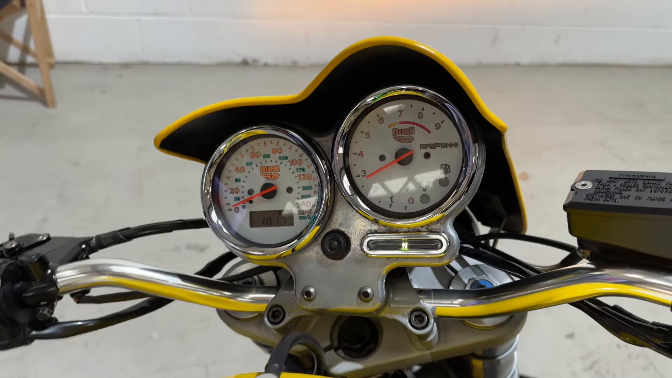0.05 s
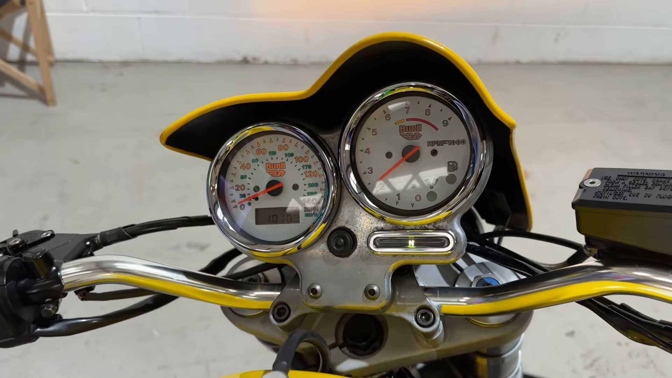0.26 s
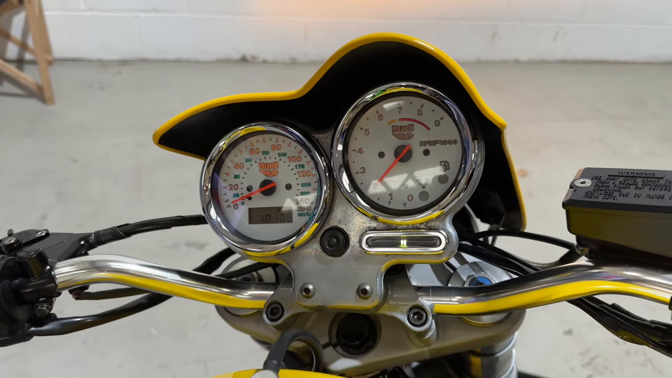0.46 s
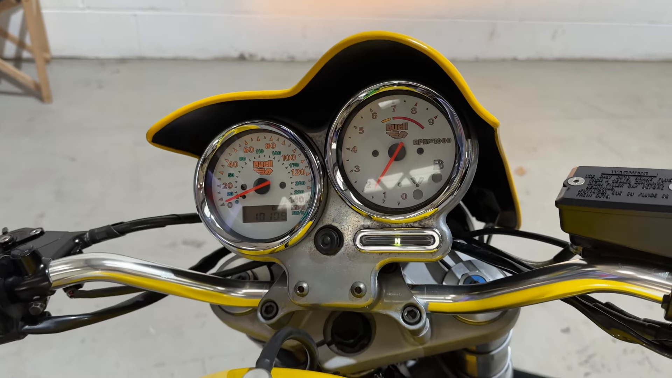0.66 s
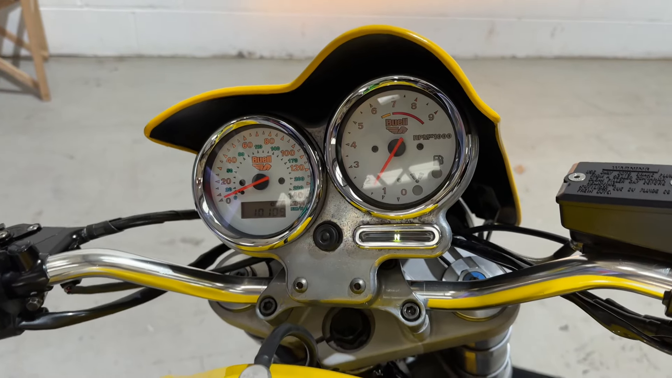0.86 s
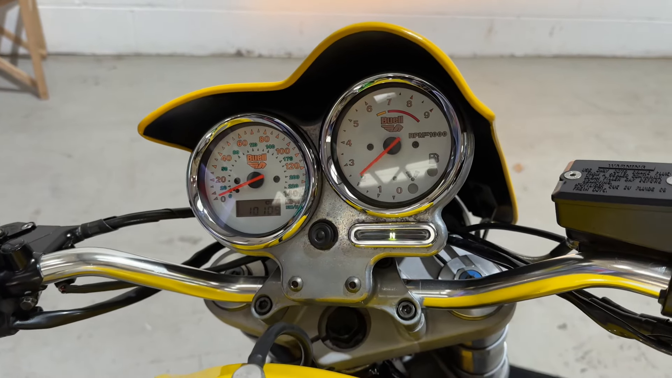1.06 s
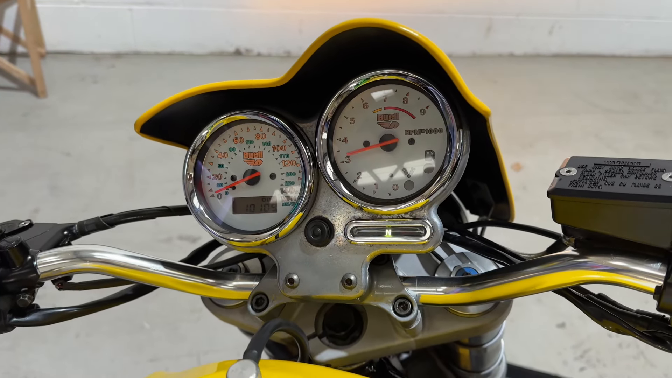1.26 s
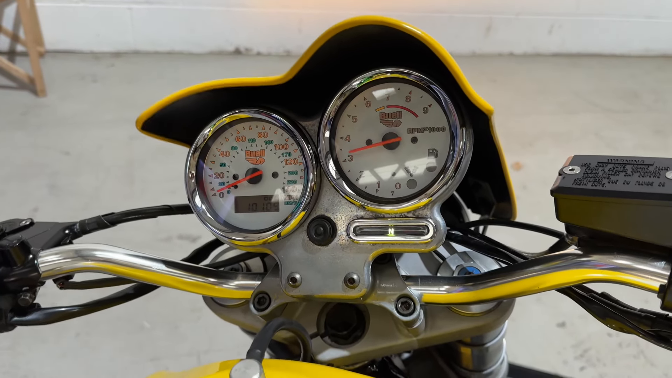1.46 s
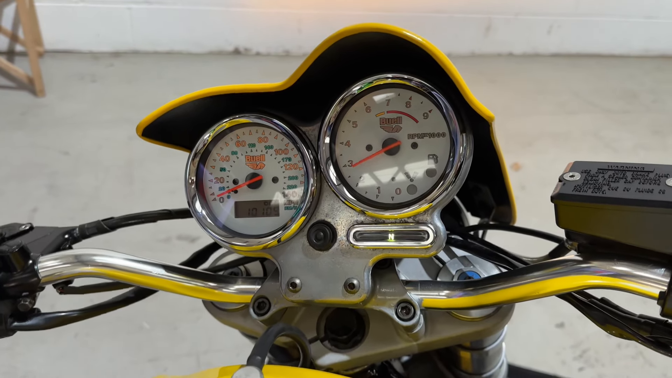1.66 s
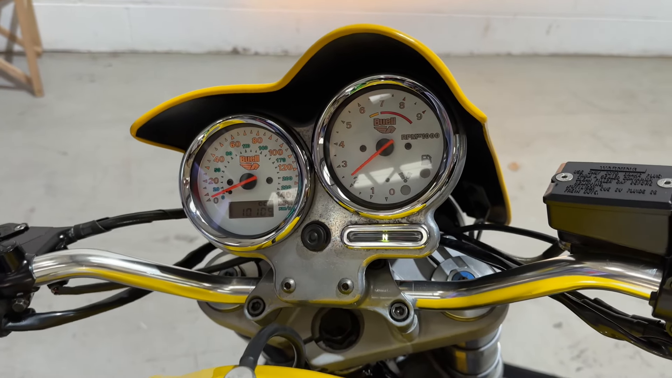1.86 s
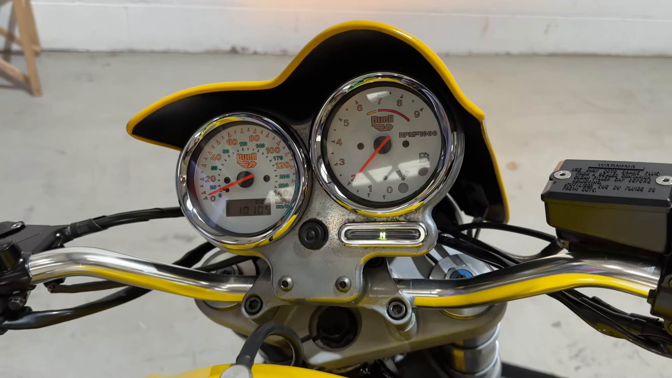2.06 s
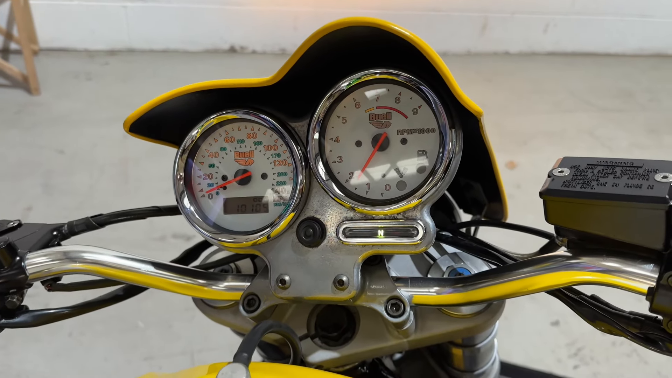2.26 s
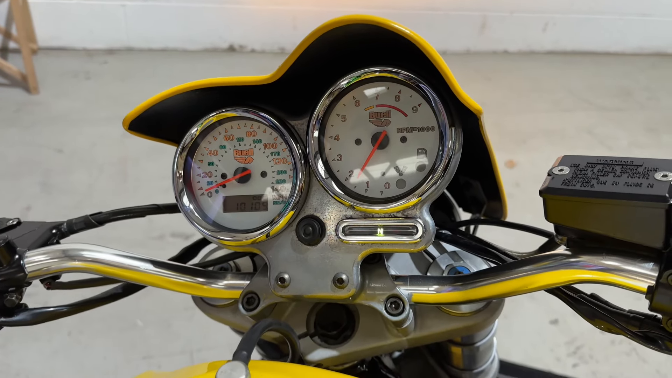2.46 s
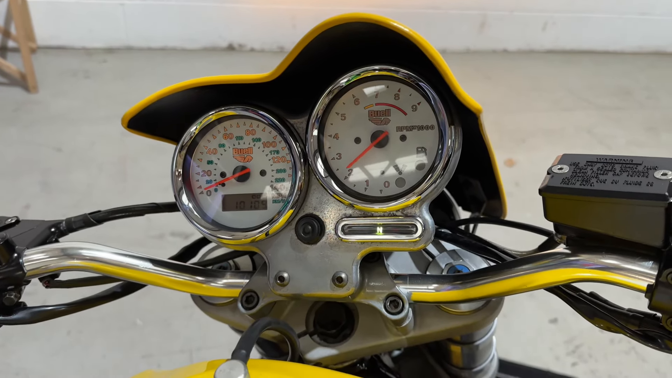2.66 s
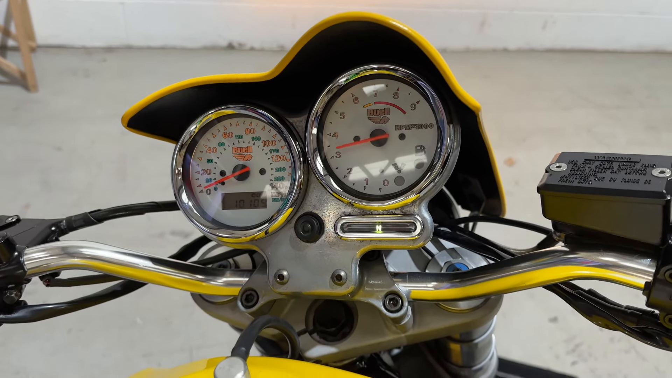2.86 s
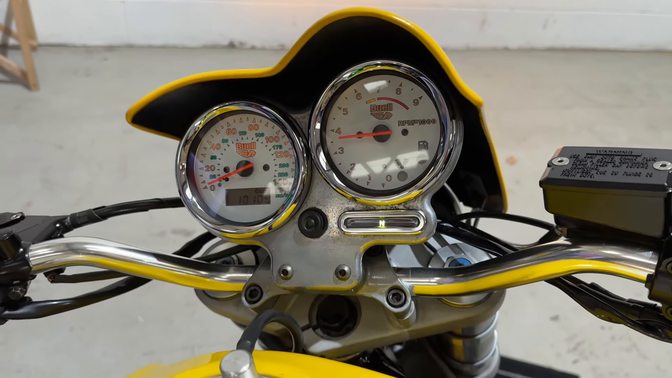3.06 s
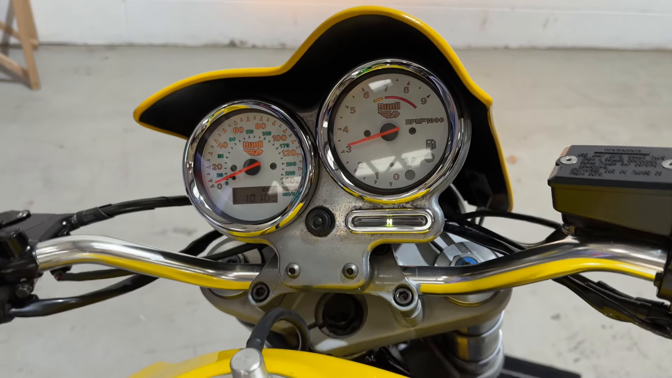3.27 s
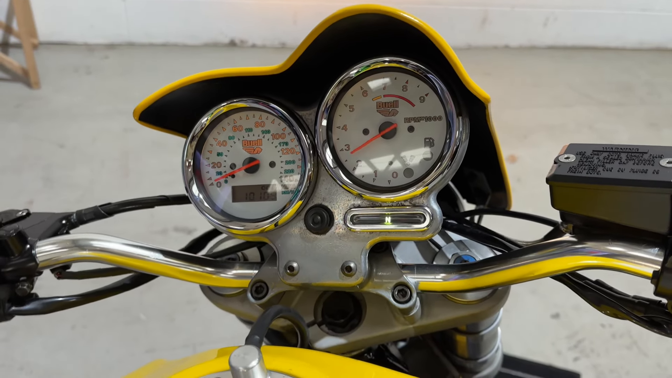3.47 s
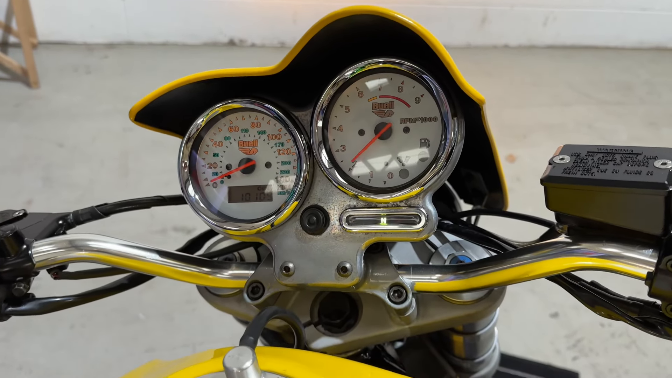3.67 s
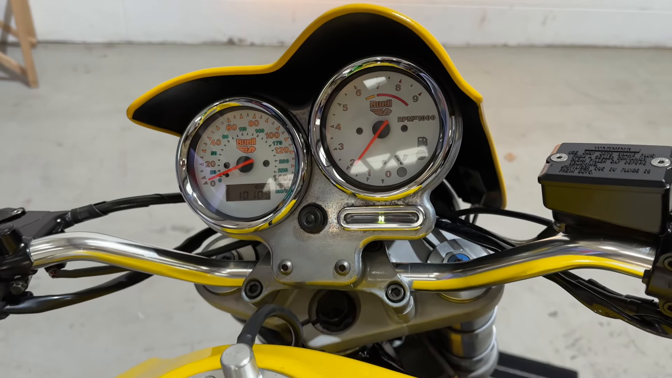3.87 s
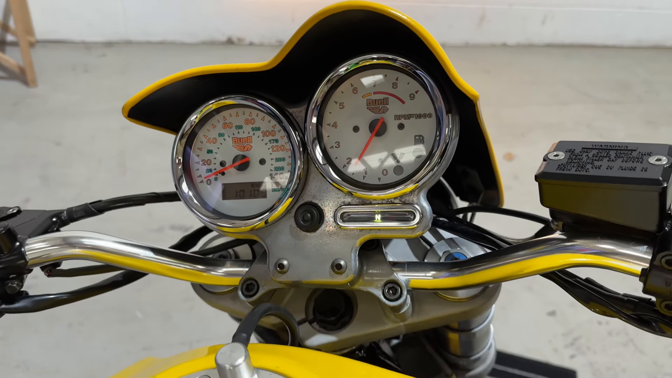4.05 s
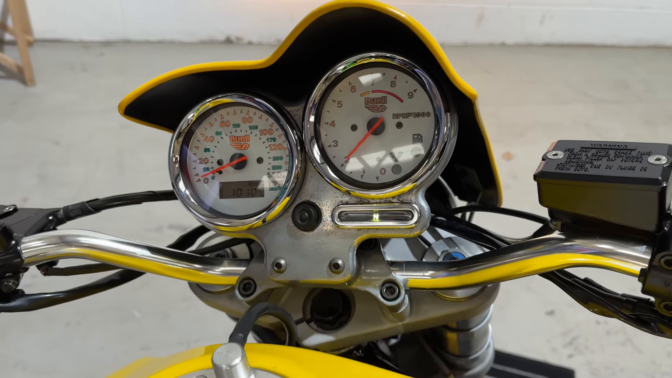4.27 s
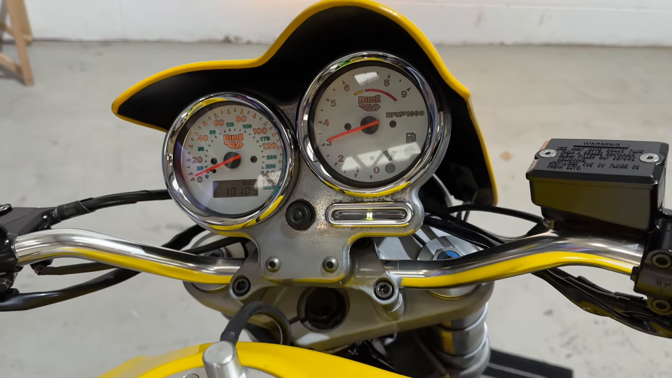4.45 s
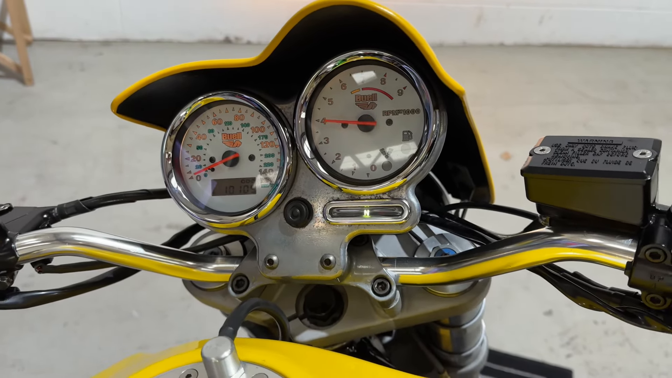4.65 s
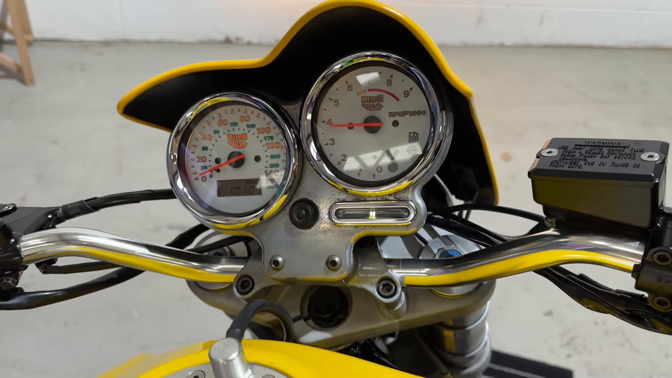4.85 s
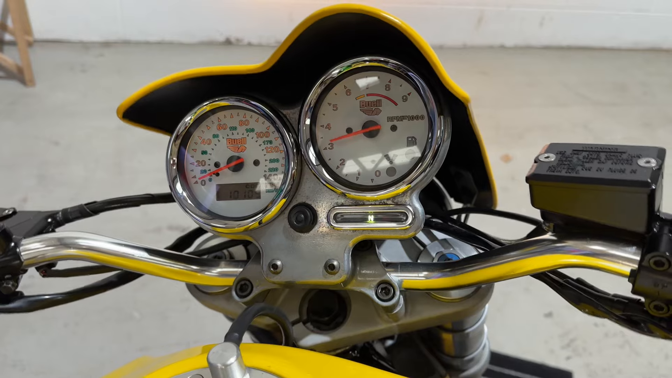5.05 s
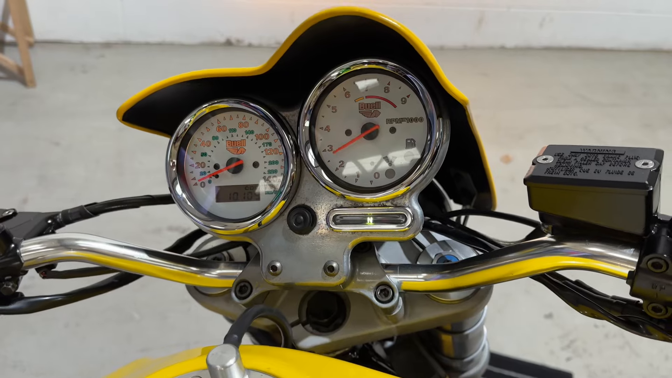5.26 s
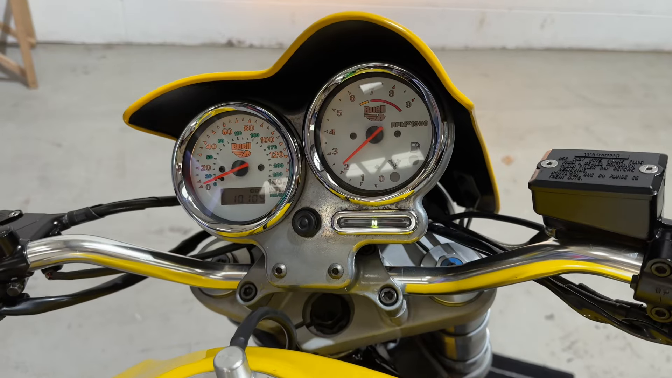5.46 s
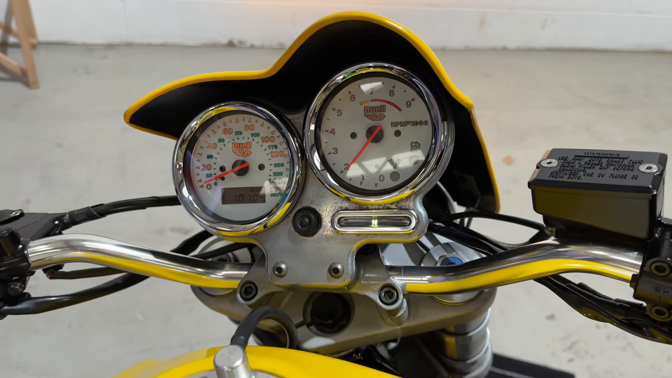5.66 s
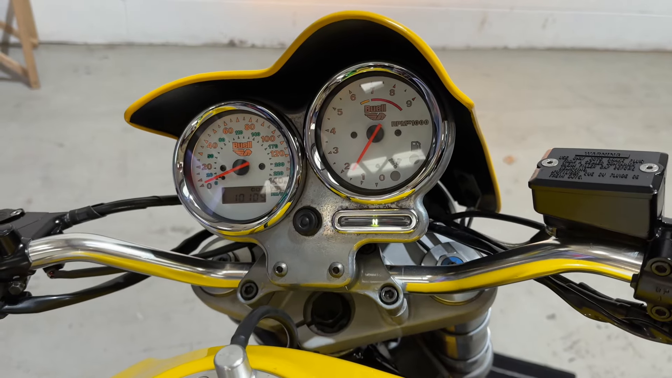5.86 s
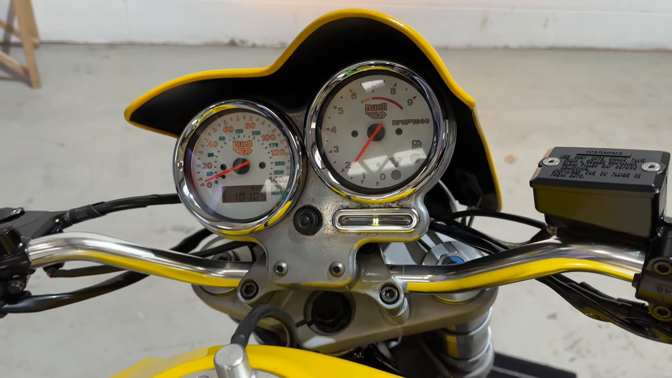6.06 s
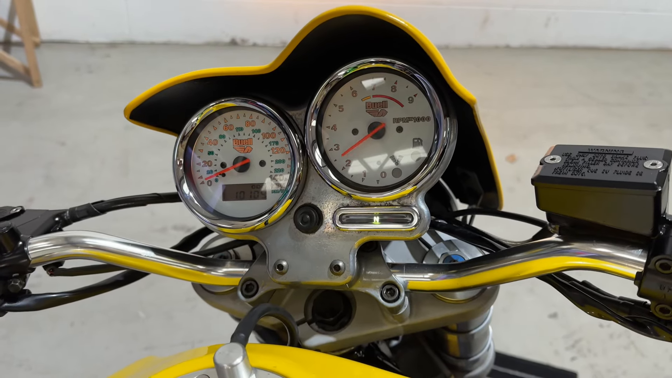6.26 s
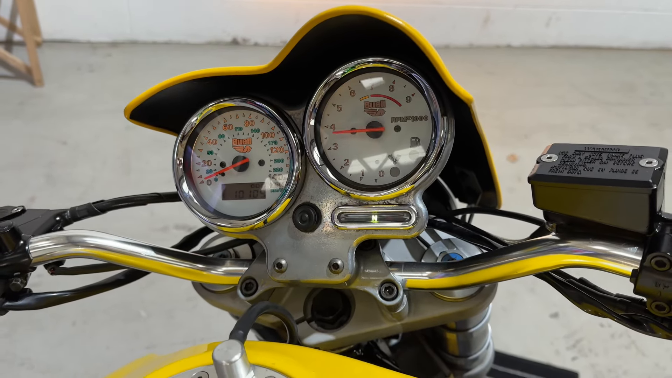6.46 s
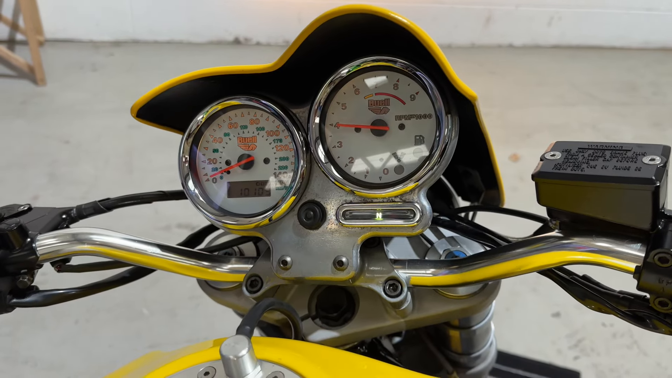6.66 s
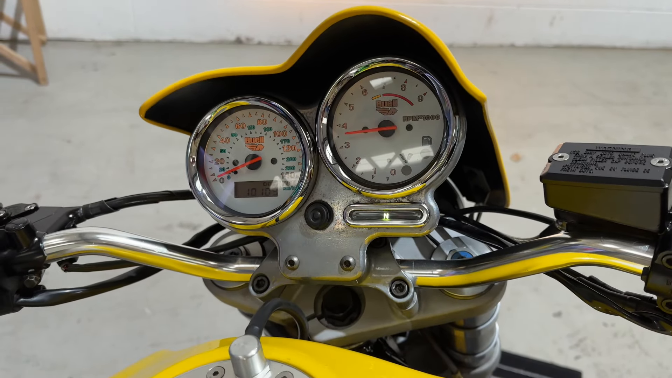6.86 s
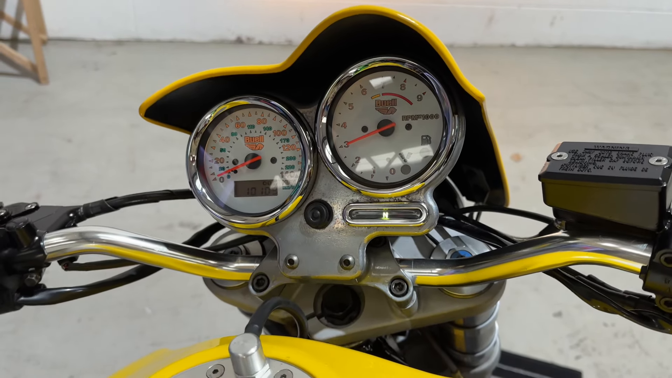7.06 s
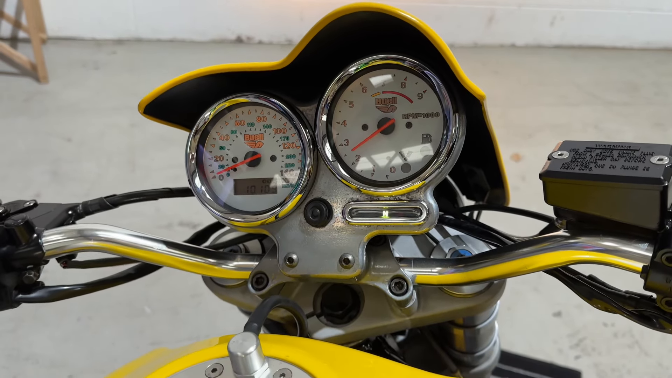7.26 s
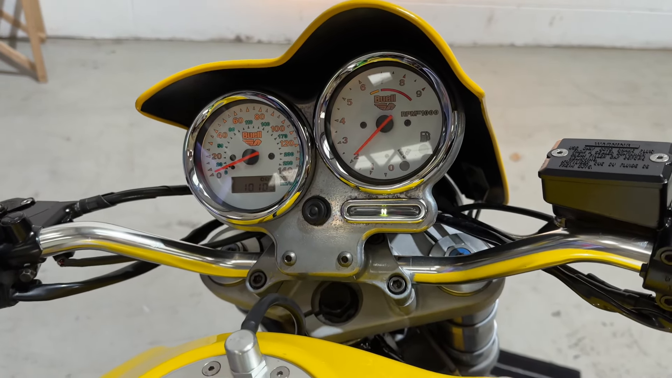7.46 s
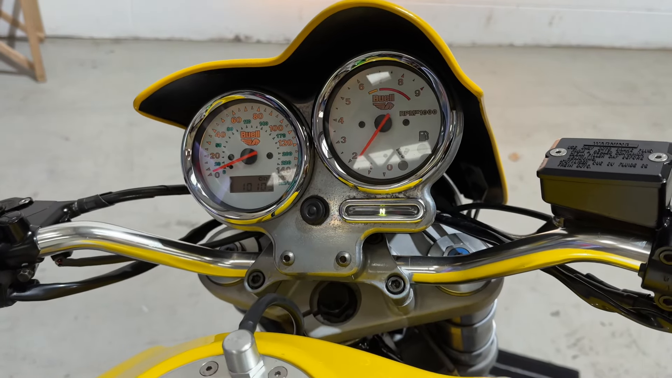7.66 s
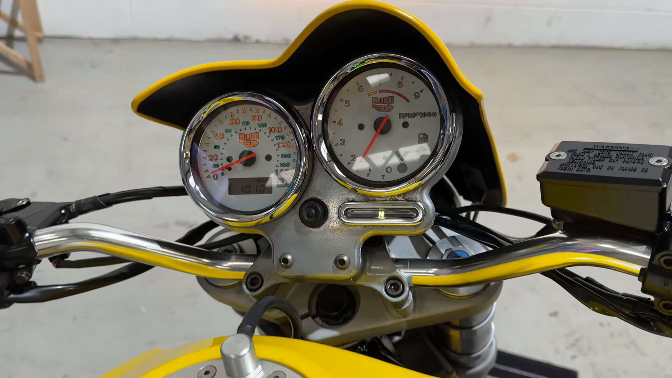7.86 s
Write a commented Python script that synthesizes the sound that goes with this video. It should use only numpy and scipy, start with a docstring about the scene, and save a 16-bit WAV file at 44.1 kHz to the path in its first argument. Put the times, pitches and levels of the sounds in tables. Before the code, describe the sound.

A big V-twin motorcycle engine is blipped five times in a hard-walled workshop, each bark swelling fast then sinking back to a lumpy idle.

```python
"""In a hard-walled workshop, heard from the saddle, a big 45-degree V-twin is blipped five times. A crankshaft
model turns throttle into speed, and its uneven firings ring the exhaust and the room. Shaped noise makes the
gas roar, the intake hiss and the cracks; small struck resonances make the clatter. Stereo: left and right
nearly alike in the bass, more diffuse through the mids and treble; above 10 kHz one band is opposite in the two
sides and the top is alike in both."""
import sys
import numpy as np
from scipy import signal
from scipy.fft import rfft, irfft, next_fast_len
from scipy.io import wavfile
from scipy.ndimage import uniform_filter1d, minimum_filter1d

SR = 44100
rng = np.random.default_rng(int(sys.argv[2]) if len(sys.argv) > 2 else 0)


def wav_record(signal):
    """Record a signal, one row per channel, as 16-bit PCM in the file named by sys.argv[1]."""
    frames = np.transpose(np.atleast_2d(signal))
    bounded = np.clip(frames, -1, 1)
    # unit amplitude maps onto the largest positive 16-bit level
    quanta = np.round(bounded * 32767).astype(np.int16)
    wavfile.write(sys.argv[1], SR, quanta)


N = 349272  # samples

START_TURN = 0.75  # place in the four-stroke cycle at the start
REAR_FIRES = 315 / 720  # share of the cycle between the two firings
REAR_DB = -0.5  # rear against front cylinder
CYLINDERS = ((0, 0), (REAR_FIRES, REAR_DB))  # offset in cycles, level_db
CYCLES = np.arange(400)  # cycle numbers, for chance drawn once a cycle
OPEN_PULL = 27  # pull in cycles per s each s at which the throttle counts as fully open


def gain_of(db):
    """Amplitude factor for a level in dB."""
    return 10 ** (np.asarray(db) / 20)


def evened(x):
    """Scales x to an rms of one."""
    return x / np.sqrt(np.mean(x ** 2) + 1e-20)


def levelled(x, span_s):
    """Divides out the slow swell of x."""
    power = uniform_filter1d(x ** 2, max(int(span_s * SR), 1))
    return x / np.sqrt(np.abs(power) + 1e-12)


def read(points, hz):
    """Reads a (hz, value) table along a logarithmic frequency axis."""
    point_hz, value = np.transpose(points)
    return np.interp(np.log(hz + 1), np.log(point_hz + 1), value)


def curve(rows, axis):
    """Draws one column of a table over time; the first column is the time in s."""
    return np.interp(np.arange(N) / SR, *np.array(rows)[:, [0, axis]].T)


def colour(x, points):
    """Shapes the spectrum of x by a (hz, level_db) table and evens the result."""
    size = next_fast_len(N)
    gain = gain_of(read(points, np.fft.rfftfreq(size, 1 / SR)))
    return evened(irfft(rfft(x, size) * gain, size)[..., :N])


def causal(x, points):
    """Minimum-phase filter of the given gain, so it rings only after its input."""
    log_gain = np.log(gain_of(read(points, np.abs(np.fft.fftfreq(32768, 1 / SR)))))
    taps = np.fft.ifft(np.exp(np.conj(signal.hilbert(log_gain)))).real[:12000]
    return signal.oaconvolve(x, taps)[:N]


def ring(x, modes):
    """Sum of damped resonators, neighbours of opposite sign."""
    t = np.arange(SR // 3) / SR
    body = 0
    for k, (hz, width_hz, db) in enumerate(modes):
        decay = np.exp(-np.pi * width_hz * t)
        body = body + (-1) ** k * gain_of(db) * width_hz * decay * np.sin(2 * np.pi * hz * t)
    return evened(signal.oaconvolve(x, body)[:N])


STEP_S = 0.002  # step of the crankshaft model


def lagged(x, lag_s, start):
    """First-order lag of a control sampled at the crankshaft step."""
    keep = np.exp(-STEP_S / lag_s)
    return signal.lfilter([1 - keep], [1, -keep], x, zi=[start * keep])[0]


def crankshaft():
    """Speed and pull: the throttle pulls the crank up, friction and pumping drag it down."""
    # throttle blips; pull is the speed the burn adds, in cycles per s each s: opens_s,
    # cracked_pull, rolls_on_s, part_pull, wide_s, full_pull, shut_s
    blips = [(0.553, 26.117, 0.877, 65.105, 0.967, 113.394, 1.126),
             (2.135, 23.126, 2.382, 49.666, 2.622, 103.013, 2.783),
             (3.914, 43.409, 4.19, 87.69, 4.24, 120, 4.52), (5.641, 16.419, 6.06, 58, 6.14, 122, 6.432),
             (7.431, 3.179, 7.88, 49.084, 8.102, 68.179, 8.3)]
    crack_s, intake_lag_s = 0.03, 0.0391  # time to crack the throttle; lag of the intake
    start_per_s, friction = 21.2517, 5.0075  # cycles per s; cycles per s each s
    coast_s = 1.3638  # time constant of the pumping drag
    t = np.arange(0, N / SR + STEP_S, STEP_S)
    grip = 0
    for opens, cracked, rolls, part, wide, full, shut in blips:
        grip = grip + np.interp(t, [opens, opens + crack_s, rolls, wide, shut],
                                [0, cracked, part, full, 0])
    pull = lagged(grip, intake_lag_s, 0)
    speed = lagged(coast_s * (pull - friction), coast_s, start_per_s)
    return [np.interp(np.arange(N) / SR, t, v) for v in (speed, pull)]


def loudness(base_db, octave_db, bend_db, pull_db, catch_share):
    """Gain of one layer from speed, pull, the changes before each catch and the engine's level."""
    # level change just before the firing catches, ahead of each layer's share: catches_s, change_db
    catches = [(0.653, -17.5), (2.205, -3.5), (4.039, 0), (5.811, 0.5), (7.705, -12.5)]
    # level of the whole engine on top of what speed and pull give: time_s, level_db
    engine_level = [(0, 3), (.12, -1.3), (.6, 0.6), (.9, 3.5), (1.15, 2.5), (1.6, -2.5), (2.15, -4),
                    (2.8, 2.5), (3.3, -4), (3.92, -6.5), (4.25, 0), (4.55, 3), (5.0, -2), (5.68, -10.5),
                    (6.45, 2.5), (7.0, -4.5), (7.55, -10.5), (7.92, -5)]
    onset_s, full_s = 0.18, 0.018  # before the catch: the change sets in; it is complete
    speed, pull = crankshaft()
    t = np.arange(N) / SR
    octaves = np.log2(speed / 20)
    change_db = sum(np.interp(t, [s - onset_s, s - full_s, s], [0, db, 0]) for s, db in catches)
    speed_db = octave_db * octaves + bend_db * octaves ** 2
    return gain_of(base_db + speed_db + pull_db * pull / 100
                   + catch_share * change_db + curve(engine_level, axis=1))


def firings(spread_db, late_s):
    """One click a firing, with uneven burn and timing, scaled to the same power at any speed."""
    speed = crankshaft()[0]
    turns = START_TURN + np.cumsum(speed) / SR
    clicks = np.zeros(N)
    for offset, db in CYLINDERS:
        at = np.flatnonzero(np.diff(np.floor(turns - offset)))
        burn, late = rng.standard_normal((len(CYCLES), 2))[:len(at)].T
        at = np.clip(at + (late * late_s * SR).astype(int), 0, N - 1)
        clicks[at] = gain_of(db + spread_db * burn) / np.sqrt(speed[at])
    return clicks


def puffs(clicks, decay_s, steady):
    """Envelope of the gas flow: a burst after each firing over a steady part."""
    t = np.arange(4000) / SR
    puff = (1 - np.exp(-t / 0.0058)) * np.exp(-t / decay_s)
    burst = signal.oaconvolve(clicks, puff)[:N]
    return steady + (1 - steady) * levelled(burst, span_s=0.54)


def hall(x, wet_db):
    """Sparse reflections, each band dying at its own speed: source plus room, and diffuse room alone."""
    # reverberation of the workshop: hz, t60_s
    reverb = [(100, 0.93), (500, 0.35), (2000, 0.68), (8000, 0.38)]
    taps = np.zeros((2, SR))
    at = np.arange(200, SR - 20, 20) + rng.integers(0, 20, (2, (SR - 201) // 20))
    np.put_along_axis(taps, at, rng.choice([-1., 1.], at.shape), 1)
    hz, t, bands = signal.stft(taps, SR, nperseg=512)
    decay = gain_of(-60 * t / read(reverb, hz)[:, None])
    tail = signal.istft(bands * decay, SR, nperseg=512)[1]
    wet = signal.fftconvolve(x[None], tail / np.linalg.norm(tail[0]), axes=1)[:, :N]
    wet_share = 1 / (1 + gain_of(-2 * wet_db))  # of the power
    near = np.sqrt(1 - wet_share) * x + np.sqrt(wet_share) * wet[0]
    return np.array([near, wet[1]])


def clatter(clicks):
    """Intake hiss throbs with the cycle; valves and gears tick at random, denser at speed."""
    # intake hiss: hz, relative level_db per Hz
    hiss_colour = [(900, -26.5), (1800, -4), (2500, -2), (3300, -4), (4500, -8), (6300, -8), (7200, -12.5),
                   (9000, -13), (10300, -14), (12500, -21.5), (14500, -17.5), (16000, -17.5)]
    # parts that tick: hz, width_hz, level_db
    valve_gear = [(2140, 230, 3.5), (2680, 210, 2.5), (3400, 720, -0.5), (3950, 410, -6.5), (4820, 150, -1),
                  (5640, 300, -3), (6800, 1100, -3), (8820, 730, -4.5)]
    # base_db at 20 cycles per s, db per octave of speed, bend db per octave squared,
    # db per 100 of pull, share of the change before a catch
    layer = (-37.5, 6, -2.4, 0.5, 0.13)
    hiss = puffs(clicks, decay_s=0.01, steady=0.84) * rng.standard_normal((2, N))
    strength = gain_of(4.5 * np.minimum(rng.exponential(1, N), 3))
    struck = rng.random(N) < 30 * crankshaft()[0] / SR  # on average 30 ticks a cycle
    size = strength * struck
    part = rng.integers(0, len(valve_gear), N)
    tick_decay = np.exp(-np.arange(300) / SR / 0.0023)
    ticks = 0
    for k, mode in enumerate(valve_gear):
        envelope = signal.oaconvolve(size * (part == k), tick_decay)[:N]
        sides = [ring(envelope * noise, [mode]) for noise in rng.standard_normal((2, N))]
        ticks = ticks + gain_of(mode[2]) * np.array(sides)
    return loudness(*layer) * (colour(hiss, hiss_colour) + gain_of(-9.0) * evened(ticks))


def roar(clicks):
    """Turbulent gas leaves the pipe in puffs and shakes the casings."""
    # gas noise: hz, relative level_db per Hz
    gas_colour = [(88, -13.5), (150, 12), (227, -14), (284, -18.5), (370, -18), (481, -11.5), (525, -17.5),
                  (719, -12), (846, -14.5), (1060, -13.5), (1450, -27.5), (1650, -29), (2420, -42.5),
                  (3000, -49.5), (3900, -69), (6600, -120)]
    # casings and bodywork that the roar sets ringing: hz, width_hz, level_db
    casing = [(487, 22, 3.5), (579, 45, -5.5), (720, 24, 1.5), (652, 14, -10.5), (805, 26, 0),
              (1070, 7.2, -26), (1266, 8.8, 8), (1368, 165, -1), (2235, 17, -7), (2376, 22, -5.5),
              (2744, 19, -9), (4530, 67, -13.5)]
    # base_db at 20 cycles per s, db per octave of speed, bend db per octave squared,
    # db per 100 of pull, share of the change before a catch
    layer = (-27.5, 7, -3, 0, 0)
    flow = puffs(clicks, decay_s=0.014, steady=0.72) * rng.standard_normal((2, N))
    low_cut = signal.butter(4, 330, "high", fs=SR, output="sos")
    gas = evened(signal.sosfilt(low_cut, colour(flow, gas_colour)))
    shaken = np.array([ring(side, casing) for side in flow])
    return loudness(*layer) * evened(gas + gain_of(-8.0) * shaken)


def cracks():
    """Single hard firings crack across all bands: short bursts of noise with a hard front."""
    # start_s, level_db of the front
    hard_firings = [(1.014, -24.5), (1.068, -32.5), (1.243, -29.5), (4.334, -25.5), (6.238, -28.5),
                    (7.636, -52.5)]
    # hz, relative level_db per Hz
    crack_colour = [(300, -18.5), (700, 5), (1500, -14), (2500, -7.5), (6500, -17.5), (10000, -16.5),
                    (16000, -35)]
    decay_s = 0.029
    t = np.arange(N) / SR
    swell = sum((t > s) * gain_of(db) * np.exp(-np.maximum(t - s, 0) / decay_s)
                for s, db in hard_firings)
    return swell * colour(rng.standard_normal((2, N)), crack_colour)


def throat(clicks):
    """Wide open, each firing cracks through the pipe: a coarse bark that bursts in, holds and fades."""
    # full_s when the rise is complete, level_db, hold_s
    bursts = [(0.997, -22, 0.13), (2.661, -23.5, 0.056), (4.338, -19, 0.093), (6.243, -21, 0.12)]
    # pipe resonances in the bark: hz, width_hz, level_db
    pipe_modes = [(384, 24, -0.5), (475, 18, -4.5), (583, 21, 1), (655, 35, -1.5), (723, 57, 2.5),
                  (886, 66, -10), (1070, 42, 1.5), (1252, 38, -6), (1450, 120, -16.5)]
    rise_s, fade_db_per_s = 0.013, 78.5
    t = np.arange(N) / SR
    swell = 0
    for s, db, hold_s in bursts:
        rise = np.clip((t - s) / rise_s + 1, 0, 1)
        swell = swell + rise * gain_of(db - fade_db_per_s * np.maximum(t - s - hold_s, 0))
    turbulence = puffs(clicks, decay_s=0.006, steady=0.25) * rng.standard_normal(N)
    fronts = 0.6 * evened(clicks) + turbulence
    return hall(swell * levelled(ring(fronts, pipe_modes), span_s=0.51), wet_db=-6.0)


def blows(spread_db, late_turns, idle_per_s):
    """Each cylinder blows once a cycle, with another shape when it gains speed or holds its idle."""
    # shape of one blow in crank angle, before the load weights below:
    # order of the cycle, coasting_db, loaded_db
    blow_orders = [(1, -33, -34), (2, -3.5, -4.5), (3, -1, -3), (4, -2, -2), (5, -6, -2.5), (6, -8.5, -5.5),
                   (7, -15.5, -7.5), (8, 1, -23), (9, -15.5, -7.5), (10, -16, -16), (11, -16, -18),
                   (12, -23.5, -13), (14, -28, -11), (20, -37, -18)]
    top_per_s = 36  # cycles per s at which the blows take their plain shape and spread
    dulling_db = -0.25  # loss per order for each octave below top; negative, so slow blows are sharper
    idle_lump = 0.9  # power by which the burn grows more uneven as the speed falls
    stride = 20  # the blows are computed at every 20th sample
    speed = crankshaft()[0]
    driven = (np.gradient(speed) > 0) | (speed < idle_per_s)
    load = uniform_filter1d(1. * driven, 3000)[::stride]
    turns = (START_TURN + np.cumsum(speed) / SR)[::stride]
    slowness = top_per_s / speed[::stride]
    dull_db = dulling_db * np.log2(slowness)
    lumpy_db = spread_db * slowness ** idle_lump
    order, coasting_db, loaded_db = np.transpose(blow_orders)
    blown = 0
    for offset, db in CYLINDERS:
        burn, late = rng.standard_normal((len(CYCLES), 2)).T
        own = turns - offset
        own = own - late_turns * np.interp(own, CYCLES, late)
        shape = 0
        for k in range(1, 21):
            coasting = np.interp(k, order, coasting_db) - k * dull_db
            loaded = np.interp(k, order, loaded_db)
            # the coasting dB weigh 1.5 off load and still 0.5 under full load
            order_gain = gain_of((1.5 - load) * coasting + load * loaded)
            shape = shape + order_gain * np.cos(2 * np.pi * k * own)
        blown = blown + gain_of(db + lumpy_db * np.interp(own, CYCLES, burn)) * shape
    # the wave runs to and fro in the silencer: an all-pass spreads each blow in time
    bounce = np.zeros(18)
    bounce[[0, -1]] = 1, -0.45
    spread = signal.lfilter(bounce[::-1], bounce, blown)
    return signal.resample_poly(spread, stride, 1)[:N]


def exhaust(clicks):
    """The two cylinders' blows boom in silencer and room; turbulent fronts ring the short pipe."""
    # response of silencer and room to the blows: hz, level_db
    booms = [(20, -43.5), (38, -37), (43, -20.5), (52, -9), (60, -12), (68, 4), (76, -6), (85, 3), (93, 0),
             (104, 2.5), (118, -0.5), (134, -6.5), (147, 0.5), (157, 6), (167, 2), (182, -8.5), (207, -1),
             (228, -2), (246, -6), (258, -9.5), (275, 6), (300, 0), (325, 0), (355, -9), (600, -33)]
    # standing waves of the workshop: hz, width_hz, level_db
    room_modes = [(65.1, 12, -12.5), (155.8, 5.9, -14), (274, 15, -17.5)]
    # short pipe resonances: hz, width_hz, level_db
    pipe_modes = [(182, 12, -4), (203.6, 21, -1), (247, 21.5, -4.5), (273.8, 21, 0), (297.3, 33, -7.5),
                  (334.4, 12, -8.5), (399, 31, -15), (482.4, 14.6, -15.5), (572.5, 25, -19)]
    # boom and bark vary from blip to blip: time_s, boom_db, bark_db
    blip_levels = [(0, 3, 0), (.3, -2, 3), (.7, -1.5, 4.8), (.93, -1.5, 5), (1.2, 2.1, 4), (1.75, 0.4, -1),
                   (2.15, -1.8, 4.5), (2.5, 0.2, 4.9), (2.85, 0.5, 2.5), (3.3, 3, 0), (3.8, -2.5, 1.5),
                   (4.2, -0.5, 3), (4.6, 2, 1), (5.1, 0.6, -0.5), (5.55, -2, 1.3), (5.95, -0.1, 7),
                   (6.4, 1.8, 3), (7.0, 1.5, 2), (7.45, -2.5, 3), (7.92, 0.5, 7.5)]
    # both layers: base_db at 20 cycles per s, db per octave of speed, bend db per octave squared,
    # db per 100 of pull, share of the change before a catch
    thump_layer = (-12, -0.6, -4.5, 1, 0.5)
    bark_layer = (-27, 6.5, 2.5, 4, 1.3)
    open_boom_db, open_bark_db = 1, -1  # change in level at full opening
    is_open = np.clip(crankshaft()[1] / OPEN_PULL, 0, 1)

    boom = -causal(blows(spread_db=0.9, late_turns=0.0025, idle_per_s=12.86), booms)
    boom = evened(boom) + gain_of(-17.0) * ring(boom, room_modes)
    boom_gain = gain_of(curve(blip_levels, axis=1) + open_boom_db * is_open)
    thump = boom_gain * loudness(*thump_layer) * levelled(boom, span_s=0.26)

    fronts = firings(spread_db=2.5, late_s=0.0002)
    turbulence = puffs(clicks, decay_s=0.027, steady=0.36) * rng.standard_normal(N)
    rasp = 0.59 * evened(fronts) + 0.47 * turbulence
    bark_gain = gain_of(curve(blip_levels, axis=2) + open_bark_db * is_open)
    bark = bark_gain * loudness(*bark_layer) * ring(rasp, pipe_modes)
    return hall(thump, wet_db=-15) + hall(bark, wet_db=-5)


def scene():
    """All layers follow one crankshaft; boom and bark draw their own firings; cracks have their own times."""
    clicks = firings(spread_db=5.5, late_s=0.0012)
    return exhaust(clicks) + throat(clicks) + roar(clicks) + clatter(clicks) + cracks()


def record(dry):
    """Right is part of the left signal, shifted in phase, and part diffuse; from 10.5 to 12.3 kHz the sides are
    opposite, so that band sounds only in their difference, and above 13 kHz they are alike; peak limiter; band
    edge."""
    # likeness of left and right: hz, 0 to 1
    likeness = [(50, 0.999), (80, 0.993), (130, 0.98), (290, 0.78), (640, 0.5), (1400, 0.42), (2500, 0.38),
                (5000, 0.28), (9000, 0.45), (10200, 0), (10500, 1), (12300, 1), (12500, 0), (13000, 0),
                (13200, 1)]
    # phase of left against right: hz, rad; left leads more as the pitch rises up to 10 kHz; above that the
    # sides are opposite from 10.5 to 12.3 kHz and alike again above 13 kHz
    left_lead = [(0, 0), (690, 1.2), (3010, 8.8), (6720, 20.7), (10400, 9 * np.pi), (12400, 9 * np.pi),
                 (13100, 8 * np.pi)]
    # left against right: hz, balance_db
    balance = [(60, -1.5), (200, -1), (380, -.5), (700, 1), (1290, 2), (2380, .5), (4400, 3.5), (6500, 3),
               (8120, -2), (10300, 0)]
    ceiling = 0.94  # level at which the limiter holds the peaks
    edge_hz = 15550
    size = next_fast_len(N + 2000)
    hz = np.fft.rfftfreq(size, 1 / SR)
    near, diffuse = rfft(dry, size) * (hz > 12)
    same = np.clip(read(likeness, hz), 0, 1)
    lead = np.interp(hz, *np.transpose(left_lead))
    right = same * np.exp(-1j * lead) * near + np.sqrt(1 - same ** 2) * diffuse
    tilt = gain_of(read(balance, hz) / 2)  # half of the balance on each side
    stereo = irfft([near * tilt, right / tilt], size)[:, :N]
    peak = -minimum_filter1d(-np.abs(stereo).max(0), size=201)
    limiter_gain = uniform_filter1d(np.minimum(ceiling / (peak + 1e-9), 1), size=101)
    low_pass = signal.firwin(511, edge_hz, window=("kaiser", 9), fs=SR)
    return signal.oaconvolve(stereo * limiter_gain, low_pass[None], "same")


dry = scene()
out = record(dry)
wav_record(out)
```